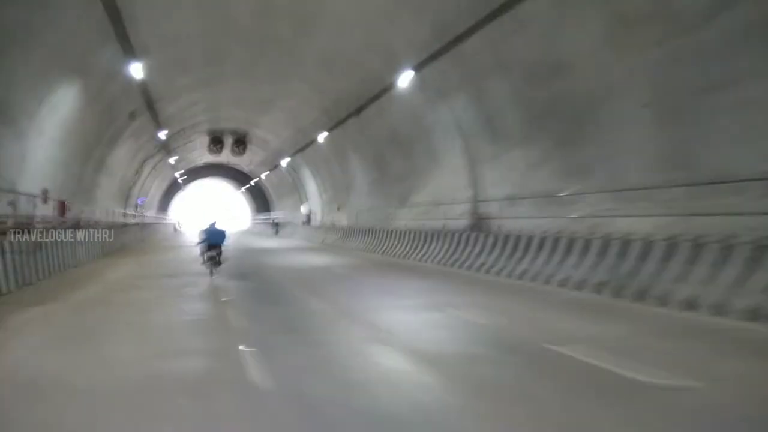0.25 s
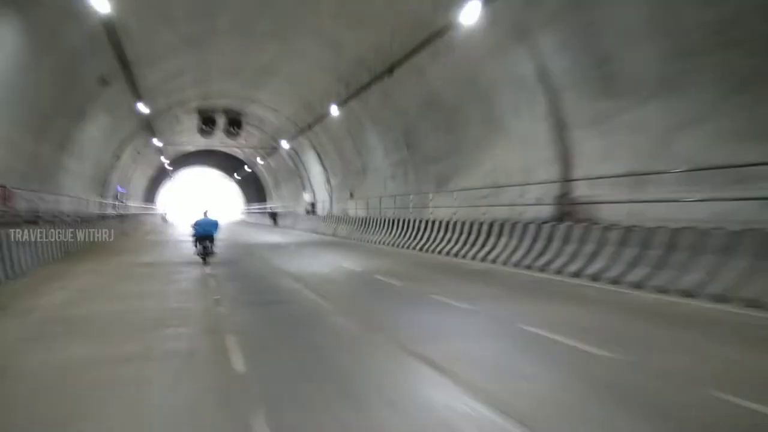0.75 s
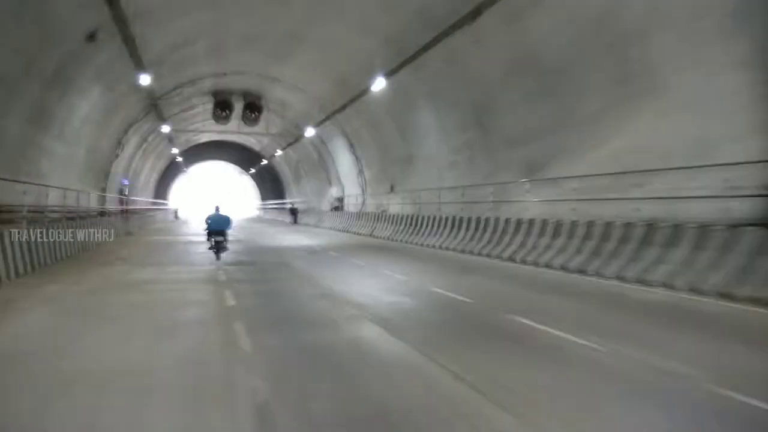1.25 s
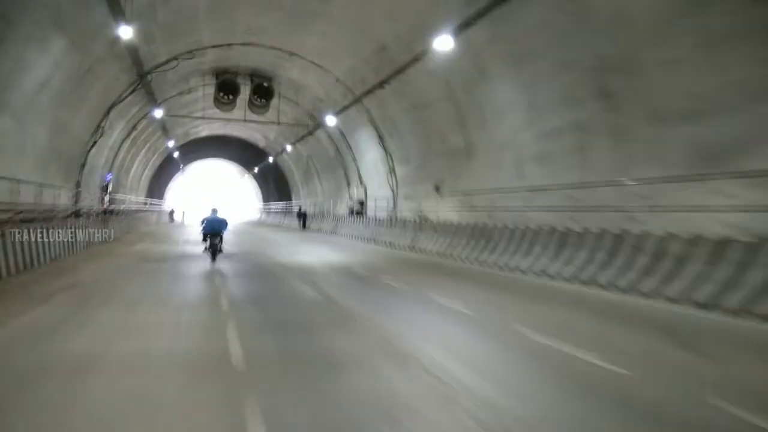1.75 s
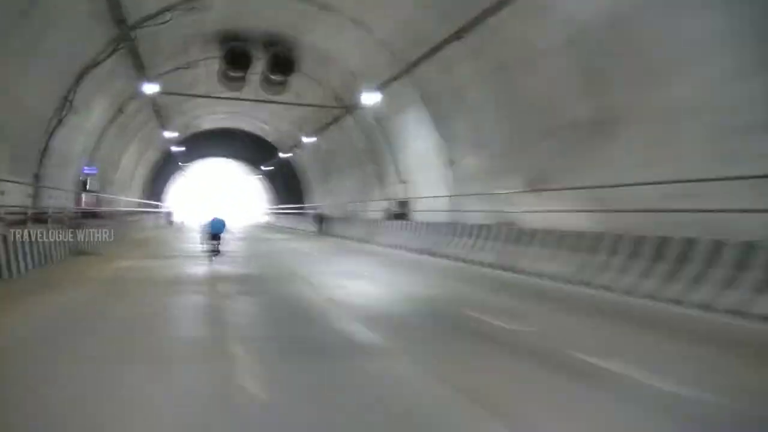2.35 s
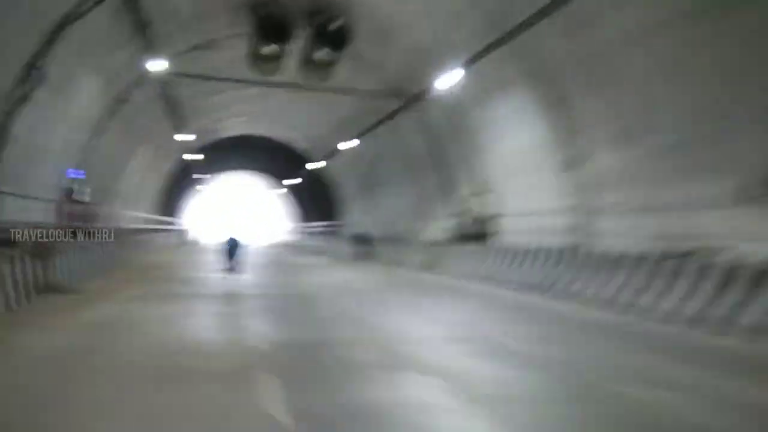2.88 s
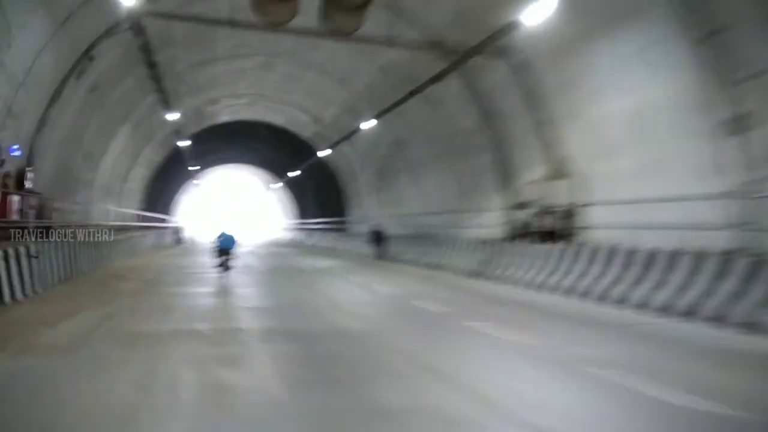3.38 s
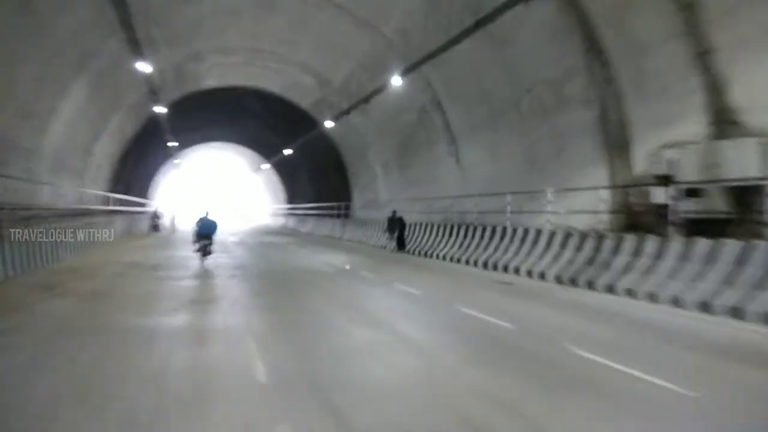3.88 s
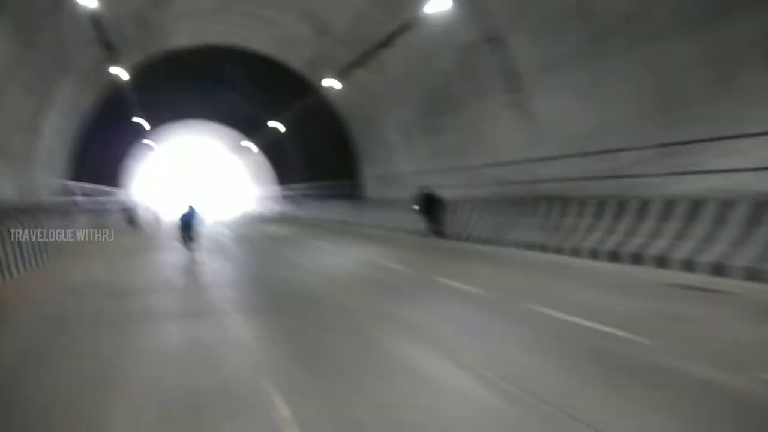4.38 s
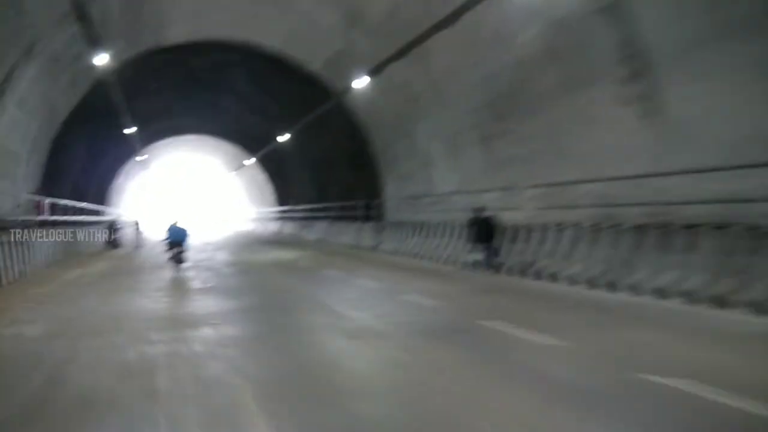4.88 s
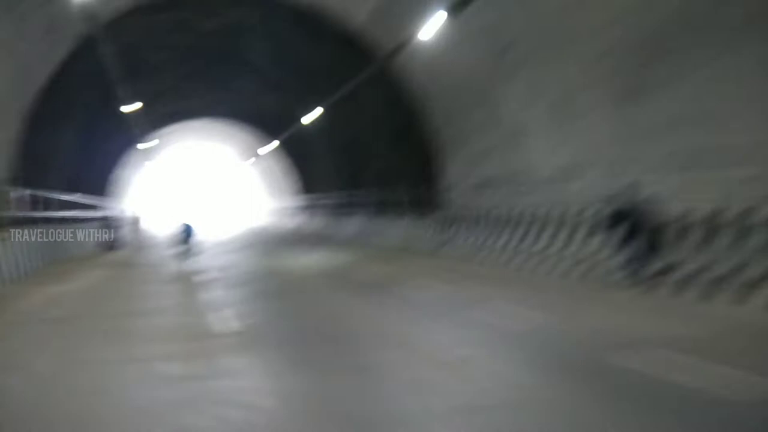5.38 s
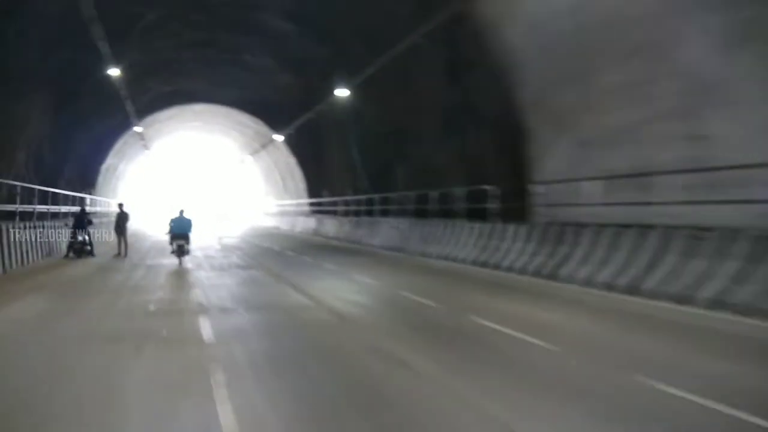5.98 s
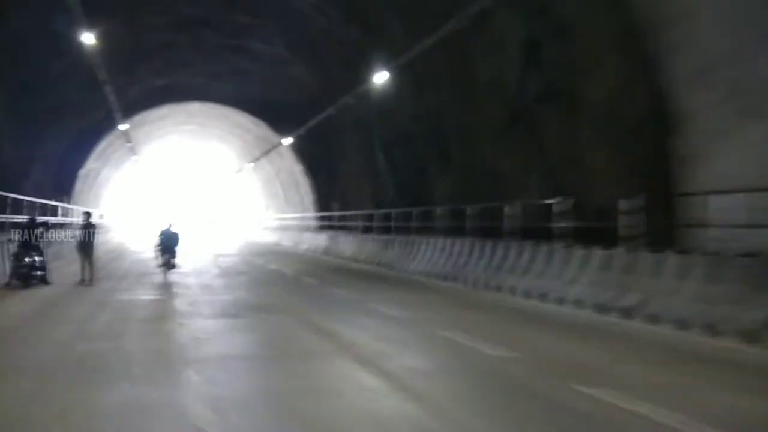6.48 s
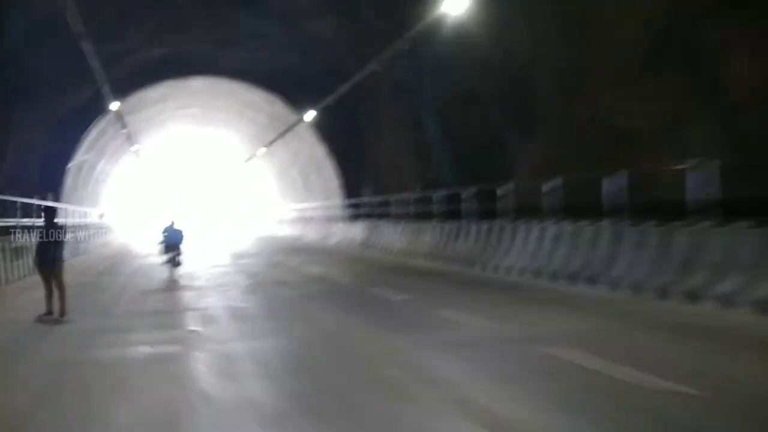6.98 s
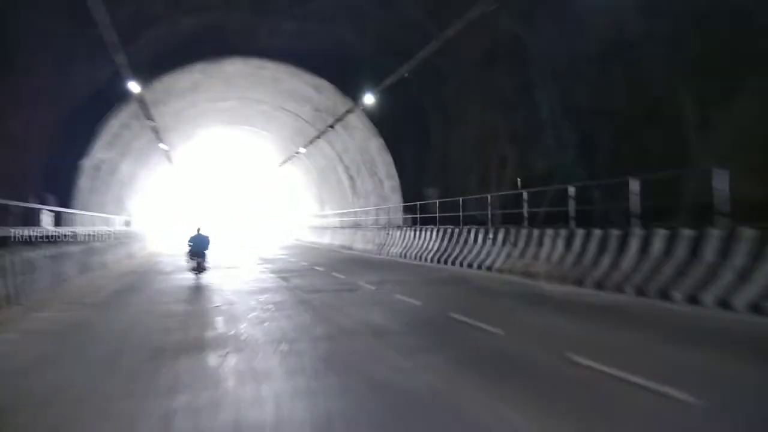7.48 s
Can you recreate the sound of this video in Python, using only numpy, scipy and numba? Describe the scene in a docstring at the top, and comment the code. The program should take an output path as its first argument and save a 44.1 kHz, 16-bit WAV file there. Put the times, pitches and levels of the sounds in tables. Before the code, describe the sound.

Riding a motorcycle steadily through a road tunnel: overloaded wind batters the left microphone, thumps intermittently on the right, covering hiss and low engine drone.

```python
"""Motorcycle in a road tunnel

A two-port camera rides in the airstream of a motorcycle going steadily through a road tunnel.
The left port faces the wind: overdriven turbulence, with crackle, slaps, throbs and knocks as vortex bursts.
The sheltered right port rumbles, thumps and rasps as single gusts reach round to it.
Beneath lie filtered-noise hiss of tyres and air, swishes and tunnel roar, and an engine of uneven
firing pulses that rings the exhaust and returns from the tunnel as a drone."""
import sys
import numpy as np
from scipy import signal
from scipy.fft import rfft, irfft
from scipy.io import wavfile
from scipy.ndimage import uniform_filter1d, minimum_filter1d
from numba import njit

SR = 44100
rng = np.random.default_rng(int(sys.argv[2]) if len(sys.argv) > 2 else 0)


def file_out(sig):
    """Save sig as 16-bit WAV at sys.argv[1]."""
    # one column per channel
    cols = np.atleast_2d(sig).T
    # limit, then scale
    lim = np.clip(cols, -1, 1)
    pcm = np.round(lim * 32767).astype(np.int16)
    wavfile.write(sys.argv[1], SR, pcm)


N = 341334
TIME = np.arange(N) / SR

FIRING_HZ, FLUTTER_HZ = 48.6, 14.15  # mean rates of the exhaust firings and of the hiss's flutter
TOP_HZ = 15600  # upper edge of the recorded band
LEE_RISE_DB_PER_S, LEE_FALL_DB_PER_S, LEE_CALM_DB = 620, 317, -42  # gusts at the sheltered port

# Exhaust as heard from the saddle. Each row: frequency in Hz, relative response in dB.
EXHAUST_COLOUR = [(45, -59), (95, -45), (150, -2), (200, 52), (300, -64), (600, -44), (1500, -8),
                  (5000, -31)]
# Road roar that fills the tunnel. Each row: frequency in Hz, relative response in dB.
ROAR_COLOUR = [(30, -12), (80, 32), (140, 67), (280, -13), (500, 18), (800, -16), (1050, 4), (1500, -25),
               (2000, -12), (4000, -38)]

# Course of the tyre and air hiss. Each row: time in seconds, level in dB above the usual.
HISS_COURSE = [(0.0, -3), (0.47, -10.5), (0.65, 1.5), (0.97, -4), (1.06, 8.5), (1.84, -5.5), (2.21, 2),
               (2.53, -2), (2.94, 5.5), (3.14, -2.5), (3.62, 7), (3.94, 5.5), (4.74, -6.5), (5.55, 3.5),
               (5.64, -2), (6.17, -5), (6.35, 1.5), (7.64, -2.5)]
# Brief changes of that hiss, mostly on the left, before each side takes its share.
# Each row: centre in seconds, rise in dB, half length in seconds.
HISS_SWELLS = [(0.59, 10.5, 0.032), (0.86, 7, 0.06), (1.61, 10, 0.096), (1.89, 15.5, 0.17),
               (2.28, 1, 0.088), (2.44, 6.5, 0.07), (2.78, 5.5, 0.073), (3.07, 8, 0.049), (3.36, 9, 0.029),
               (3.6, -8.5, 0.082), (4.06, 10.5, 0.086), (4.27, 9, 0.034), (4.45, 11, 0.052),
               (4.61, 15.5, 0.082), (4.84, 8, 0.063), (5.0, 4, 0.063), (5.1, 11, 0.031), (5.48, 1.5, 0.082),
               (5.99, 7, 0.068), (6.4, 2, 0.033), (6.57, 8.5, 0.036), (6.75, 15, 0.08), (7.01, 8, 0.093),
               (7.45, 8.5, 0.13)]
# Colour of the hiss at the left port. Each row: frequency in Hz, relative response in dB.
HISS_COLOUR_LEFT = [(1000, 9.5), (3600, 1.5), (4400, -3), (4900, 3.5), (5600, -11), (7600, 8.5), (9100, 1),
                    (10200, 11.5), (11300, 4), (12050, 8.5), (13150, 2.5), (14000, 11), (14900, 5),
                    (15300, -12)]
# Colour of the hiss at the right port. Each row: frequency in Hz, relative response in dB.
HISS_COLOUR_RIGHT = [(1000, -1), (2600, -9), (3800, -18), (5100, 0.5), (6200, -1), (7500, 4.5), (9300, 1),
                     (10200, 4.5), (11200, -3), (14000, -4), (15800, -13)]
# Lower rush of air on the sheltered side. Each row: frequency in Hz, relative response in dB.
RUSH_COLOUR = [(1000, -8), (2100, -9.5), (2600, 8.5), (3150, -17), (3450, 10.5), (3850, -18), (4350, 10.5),
               (4800, 0.5), (5800, -21), (12000, -31)]
# Swishes, stronger on the right. Each row: peak time in seconds, level at the right port in dB,
# rise in seconds, fade in seconds, brightness in dB.
SWISHES = [(.75, -45, 0.97, 1, 7), (1.075, -36, 0.037, 0.27, 18), (1.3, -47.5, 0.1, 0.73, -1),
           (1.85, -33, 0.015, 0.13, 16), (6.73, -46, 0.025, 0.08, 16)]

# Response of the sheltered right port to wind. Each row: frequency in Hz, relative response in dB.
PORT_RIGHT = [(22, -40), (45, -19), (75, -20), (125, 4.5), (200, 8.5), (330, 8.5), (600, 4.5), (950, -11),
              (1500, 5), (2100, -11), (2900, -21), (3800, -31), (12000, -33)]
# Gusts that reach round to the right port. Each row: start of the hold in seconds, hold in seconds,
# relative level in dB.
LEE_GUSTS = [(0.0, 0.033, -21), (0.087, 0.066, -17.5), (0.23, 0.03, -13.5), (0.3, 0.12, -28),
             (0.639, 0.011, -22), (0.728, 0.018, -32), (0.873, 0.026, -16.5), (0.953, 0.041, -30),
             (1.06, 0.01, -27), (1.13, 0.005, -22), (1.205, 0.087, -14.5), (1.346, 0.018, -29),
             (1.447, 0.05, -32), (1.721, 0.18, -16.5), (1.93, 0.02, -22), (2.019, 0.02, -13),
             (2.083, 0.12, -18.5), (2.28, 0.28, -14.5), (2.58, 0.094, -17), (2.718, 0.15, -16),
             (2.877, 0.15, -19), (3.018, 0.082, -14.5), (3.196, 0.097, -28.5), (3.336, 0.03, -27),
             (3.403, 0.084, -29), (3.652, 0.11, -29), (4.006, 0.08, -28), (4.134, 0.01, -29),
             (4.185, 0.06, -17), (4.285, 0.018, -26), (4.431, 0.035, -16.5), (4.5, 0.025, -23),
             (4.572, 0.01, -31), (4.667, 0.032, -20), (4.749, 0.064, -18.5), (4.904, 0.054, -25),
             (4.99, 0.026, -14.5), (5.055, 0.053, -24), (5.168, 0.05, -42), (5.583, 0.086, -29),
             (5.736, 0.01, -46), (5.98, 0.048, -29), (6.11, 0.01, -30), (6.276, 0.018, -19.5),
             (6.343, 0.033, -30), (6.483, 0.005, -25), (6.529, 0.015, -15.5), (6.623, 0.14, -35),
             (6.772, 0.11, -17), (6.9, 0.11, -22), (7.06, 0.088, -27), (7.355, 0.039, -23),
             (7.408, 0.056, -14.5), (7.49, 0.05, -25), (7.657, 0.09, -36)]
# Single large eddies at the right port. Each row: centre in seconds, relative level in dB, pitch in Hz.
THUMPS = [(0.255, -5, 197), (0.878, -14, 238), (1.793, -2, 240), (1.876, -4, 204), (2.017, -4, 220),
          (2.325, -6, 203), (2.428, -11, 217), (2.497, -2, 234), (2.583, -12, 227), (2.728, -5, 206),
          (2.78, -2, 272), (2.817, -5, 257), (2.972, -11, 204), (3.039, -15, 297), (3.097, 0, 239),
          (4.451, -3, 236), (5.0, -6, 325), (6.537, -6.5, 190), (6.809, -11, 226), (6.843, -8, 235),
          (7.443, -11, 234)]
# Gusts that tear across the right port. Each row: centre in seconds, half length in seconds,
# bark level in dB, rasp level in dB.
RASPS = [(0.115, 0.0083, -38, -48), (0.251, 0.011, -32, -25.5), (1.056, 0.01, -32, -53),
         (1.218, 0.014, -35, -35), (1.603, 0.009, -40, -40), (1.744, 0.009, -30, -52),
         (1.793, 0.0081, -44, -36), (1.962, 0.007, -46, -37), (2.023, 0.012, -31, -44),
         (2.102, 0.014, -50, -31), (2.198, 0.012, -29, -52), (2.28, 0.008, -19, -45),
         (2.323, 0.0074, -22, -25), (2.39, 0.0052, -36, -30), (2.429, 0.008, -30, -23.5),
         (2.468, 0.0076, -31, -31), (2.499, 0.014, -24, -27), (2.525, 0.0055, -31, -30),
         (2.62, 0.012, -34, -38), (2.775, 0.019, -21.5, -26), (2.9, 0.016, -30, -30.5),
         (3.093, 0.01, -26, -27), (3.206, 0.0098, -49, -35), (3.36, 0.01, -34, -52), (3.88, 0.01, -34, -32),
         (4.138, 0.011, -31, -34), (4.217, 0.035, -28, -39), (4.443, 0.016, -25.5, -40),
         (5.001, 0.01, -39, -52), (5.054, 0.0069, -28, -29), (5.202, 0.0078, -29, -28),
         (6.48, 0.009, -37, -54), (6.818, 0.01, -25, -40), (7.427, 0.0089, -23, -26),
         (7.458, 0.016, -29, -25.5), (7.703, 0.008, -30, -54)]
# Lower resonance that such a gust excites. Each row: frequency in Hz, relative response in dB.
BARK_COLOUR = [(350, -37), (600, 5), (790, 1), (1000, -9), (1250, -17), (1600, -35)]
# Upper resonance that such a gust excites. Each row: frequency in Hz, relative response in dB.
RASP_COLOUR = [(950, -34), (1350, 4.5), (1600, 4.5), (1900, -6), (2200, -12), (2800, -23.5), (3300, -23),
               (6000, -61)]

# Response of the windward left port to wind. Each row: frequency in Hz, relative response in dB.
PORT_LEFT = [(22, -43), (45, -28), (75, -29), (125, -5), (180, -0.5), (300, 3), (550, 4.5), (675, -16),
             (780, -15), (930, 4.5), (1200, -1), (1950, -46), (2850, 0), (3300, -26), (4500, 2.5),
             (5600, -53), (12000, -31)]
# Slow course of the wind at the left port. Each row: time in seconds, strength in dB above the usual.
WIND_COURSE = [(0.0, 18.5), (0.22, -6.5), (0.59, 8), (1.0, 6), (1.76, 0.2), (2.2, -4.5), (2.66, -14.5),
               (2.91, -10.5), (3.19, 6), (3.78, -2), (4.1, -3), (4.51, -17), (4.79, 2), (5.36, -6),
               (6.03, 6.5), (6.39, -5), (6.95, 2.5), (7.54, -5)]
# Gusts on top of that wind. Each row: peak time in seconds, rise in dB, half length in seconds.
WIND_GUSTS = [(0.15, 5, 0.043), (0.35, 15, 0.12), (0.54, 17, 0.021), (1.14, 6, 0.073), (1.43, 11.5, 0.081),
              (1.99, 6, 0.2), (2.44, 12.5, 0.2), (2.81, 15, 0.083), (2.98, 6.5, 0.034), (3.51, 4.5, 0.063),
              (3.86, 10, 0.058), (4.31, 17, 0.14), (4.66, 14.5, 0.12), (5.02, 5.5, 0.086), (5.13, 7, 0.035),
              (5.42, 11.5, 0.059), (5.64, 8, 0.13), (5.85, 16, 0.017), (6.19, 8, 0.072),
              (6.68, 13.5, 0.023), (7.14, 9.5, 0.13), (7.37, 8, 0.01), (7.61, 15.5, 0.056)]
# Brief drops of the buffeting. Each row: centre in seconds, change in dB, half length in seconds.
DIPS = [(0.577, -3, 0.03), (1.206, -10, 0.013), (1.974, -3, 0.015), (2.072, -7.5, 0.0069),
        (2.271, -9.5, 0.018), (2.413, -6, 0.013), (2.885, -5, 0.012), (4.392, -4, 0.0066),
        (4.921, -11, 0.0073), (6.338, -1.5, 0.016), (6.53, -7, 0.013), (6.634, -7, 0.012),
        (6.707, -7, 0.0071), (7.279, -2, 0.046)]
# Large eddies throbbing at the left port. Each row: centre in seconds, level in dB, pitch in Hz.
THROBS = [(0.289, -4.5, 177), (0.668, -4, 195), (1.231, -4.5, 182), (1.295, -8, 193), (1.578, -8, 250),
          (1.634, -10, 188), (1.747, -10, 185), (2.354, -10, 205), (3.429, -6.5, 172), (3.778, -7.5, 179),
          (3.82, -9.5, 178), (4.321, -3, 215), (4.441, -6, 200), (4.697, -5, 176), (4.854, -5, 204),
          (5.063, -4.5, 179), (5.411, -5.5, 206), (5.565, -5, 222), (6.013, -7, 220), (6.291, -6, 233),
          (6.397, -6, 189), (6.556, -7.5, 227), (6.886, -7, 176), (6.951, -2.5, 253), (7.624, -2.5, 181),
          (7.693, -6, 190)]
# Dull, hollow knocks of air at the left port. Each row: centre in seconds, level in dB, pitch in Hz.
KNOCKS = [(0.098, -26, 826), (0.368, -18, 694), (0.415, -19, 737), (0.528, -13, 820), (0.543, -15, 815),
          (0.927, -16, 830), (1.356, -18, 784), (1.473, -19, 814), (3.368, -18, 833), (3.397, -17, 820),
          (4.287, -16, 700), (4.647, -19, 803), (4.678, -15.5, 790), (5.628, -14, 820), (6.216, -19.5, 780),
          (6.824, -19, 805)]
# The hardest gusts tear at the left port. Each row: centre in seconds, level in dB,
# half length in seconds.
TEARS = [(0.35, -27, 0.033), (0.54, -34, 0.022), (4.31, -33, 0.018), (5.12, -32, 0.028),
         (5.62, -33.5, 0.025), (5.86, -35, 0.018), (6.19, -33, 0.035), (7.125, -37, 0.025)]
# Colour of that tearing. Each row: frequency in Hz, relative response in dB.
TEAR_COLOUR = [(700, -34), (1100, 7), (2000, 7), (2800, -5), (3500, -5), (4500, -12), (5600, -22),
               (9000, -45)]
# Hard slaps of air on the left port. Each row: centre in seconds, relative body level in dB,
# pitch in Hz, relative crack level in dB.
SLAPS = [(0.073, -13, 1150, -39), (0.086, -14, 1030, -18.5), (0.098, -8.5, 955, -28),
         (0.127, -13, 1160, -32), (0.141, -15, 1190, -22), (0.16, -8.5, 1140, -28),
         (0.283, -8, 1070, -57.5), (0.304, -19, 1010, -11.5), (0.318, -16, 1430, -17),
         (0.349, -11, 1540, -18), (0.359, -8, 1160, -27), (0.367, -7, 1350, -29), (0.416, -15, 1200, -25),
         (0.435, -16, 1110, -39), (0.441, -14, 1250, -20), (0.464, -15, 1230, -26), (0.527, -10, 1160, -18),
         (0.536, -14, 1220, -25.5), (0.543, -27, 1120, -31), (0.553, -13, 1340, -29),
         (0.571, -9, 1030, -27), (0.623, -13, 1020, -26), (0.635, -9.5, 1170, -33),
         (0.683, -14.5, 1120, -26), (0.713, -16, 1350, -23), (0.743, -13.5, 1170, -21.5),
         (0.765, -14, 1080, -24.0), (0.976, -23, 1020, -25), (1.041, -14, 1190, -32),
         (1.089, -13, 1130, -27), (1.1, -12, 1120, -32), (1.318, -9.5, 980, -50), (1.359, -12, 980, -25),
         (1.393, -2, 910, -20), (1.433, -7.5, 1330, -33), (1.466, -12, 1130, -33), (1.472, -16, 1125, -29),
         (1.58, -11.5, 1100, -16.5), (1.588, -13, 1140, -23), (1.664, -10.5, 1000, -41),
         (1.91, -13, 1190, -22), (1.927, -17, 1300, -32), (1.943, -21, 1350, -32), (1.985, -21, 1400, -31),
         (2.026, -12, 1370, -31), (2.131, -11.5, 1240, -48), (2.212, -12, 1200, -33),
         (2.394, -10, 1080, -38), (2.506, -8.5, 980, -48), (2.812, -8, 1140, -33), (3.146, -18, 1290, -21),
         (3.173, -14, 1100, -16), (3.193, -30, 1100, -22), (3.205, -15, 1060, -31.5), (3.23, -6, 1110, -20),
         (3.26, -9, 1060, -32), (3.281, -9.5, 1110, -22), (3.341, -13, 1060, -41), (3.369, -9.5, 1130, -22),
         (3.396, -14, 1060, -37), (3.456, -11, 1160, -37), (3.472, -6.5, 1190, -45),
         (3.51, -8.5, 1090, -46), (3.573, -6.5, 1110, -43), (3.585, -11, 1030, -51),
         (3.814, -7.5, 900, -56), (3.925, -9.5, 930, -56), (4.129, -8.5, 960, -43),
         (4.211, -11.5, 1040, -43), (4.226, -9, 1020, -35), (4.311, -14, 970, -21), (4.345, -18, 1050, -30),
         (4.58, -20, 1320, -22), (4.678, -10, 990, -23), (4.693, -12, 1280, -21.5), (4.742, -24, 1200, -20),
         (4.782, -15, 1140, -26), (4.794, -12, 1060, -36), (4.945, -11, 1180, -21),
         (5.009, -11.5, 1290, -25), (5.017, -11.5, 1300, -23), (5.066, -11, 1080, -36),
         (5.1, -29, 1200, -15.5), (5.133, -13, 960, -12), (5.399, -10.5, 1180, -29),
         (5.411, -15, 1250, -19), (5.422, -8.5, 1140, -20), (5.607, -8, 1290, -24), (5.613, -9, 1220, -25),
         (5.63, -7, 1000, -20), (5.643, -14, 1090, -33), (5.714, -15, 1240, -21), (5.739, -14, 1180, -18.5),
         (5.846, -12, 1130, -41), (5.859, -21, 1090, -26), (5.936, -8, 1330, -28),
         (5.992, -10.5, 1200, -27), (6.019, -9, 1190, -21.0), (6.172, -13, 1320, -18),
         (6.187, -19, 1190, -21), (6.206, -10, 1010, -23), (6.301, -10, 1020, -42), (6.31, -11, 1090, -36),
         (6.611, -9.5, 1030, -47.5), (6.655, -9.5, 1100, -33), (6.696, -11, 1080, -40.0),
         (6.823, -9, 1070, -27), (7.017, -14, 1140, -26), (7.063, -13, 1140, -29.0),
         (7.108, -10, 1310, -17), (7.123, -9.5, 1200, -32), (7.135, -9, 1320, -17), (7.2, -11, 1250, -25),
         (7.212, -15, 1080, -17), (7.293, -18, 1010, -20), (7.363, -17, 1370, -20)]
# Thin, bright ticks at the left port. Each row: centre in seconds, level in dB.
TICKS = [(0.358, -21), (0.369, -23), (0.977, -20.5), (1.911, -21), (5.101, -34), (5.133, -33)]


def undb(db):
    """Decibels to gain."""
    return 10 ** (np.asarray(db) / 20)


def curve(rows):
    """Rows (s, value) joined by straight lines."""
    return np.interp(TIME, *np.transpose(rows))


def unit(x):
    """Scale to rms 1."""
    return x / np.sqrt(np.mean(x ** 2))


def smooth(x, seconds):
    """Triangular running mean."""
    size = max(int(seconds * SR), 1)
    return uniform_filter1d(uniform_filter1d(x, size), size)


def flicker(seconds):
    """Random drift of rms 1 that changes within the given time."""
    return unit(smooth(rng.standard_normal(N), seconds))


def colour(x, points):
    """Causal minimum-phase filter with the given (Hz, dB) response, made by folding its cepstrum."""
    size = 4096
    hz, db = np.transpose(points)
    bins = np.maximum(np.arange(size // 2 + 1) * SR / size, 1)
    response_db = np.interp(np.log(bins), np.log(hz), db)
    cepstrum = irfft(np.log(undb(response_db)))
    cepstrum[1:size // 2] *= 2
    cepstrum[size // 2 + 1:] = 0
    impulse = irfft(np.exp(rfft(cepstrum)))
    return signal.oaconvolve(x, impulse)[:len(x)]


def hold_level(x, seconds):
    """Fast gain control that keeps the running rms near 1."""
    return x / np.sqrt(np.abs(smooth(x ** 2, seconds)) + 1e-12)


@njit
def lowpass(x, hz):
    """Two-pole low-pass with a moving corner."""
    y, band, low = np.empty(len(x)), 0., 0.
    for i in range(len(x)):
        g = np.tan(np.pi * hz[i] / SR)
        v = (band + g * (x[i] - low)) / (1 + g * (g + np.sqrt(2.)))
        y[i] = low + g * v
        band, low = 2 * v - band, 2 * y[i] - low
    return y


def eddies(hz, slowest_hz=35):
    """Turbulent pressure of rms 1; faster air carries quicker eddies."""
    hz = np.clip(hz, 20, 2000)
    highpass = signal.butter(2, slowest_hz, "high", fs=SR, output="sos")
    stirring = signal.sosfilt(highpass, rng.standard_normal(N))
    return unit(lowpass(stirring, hz) / np.sqrt(hz))


def bell_span(s, half_s):
    """The samples within three half lengths of the time s."""
    return slice(max(int((s - 3 * half_s) * SR), 0), max(int((s + 3 * half_s) * SR), 0))


def pip(s, db, hz, half_s, phase):
    """A few cycles under a bell centred on s: (its samples, its sound)."""
    span = bell_span(s, half_s)
    t = TIME[span] - s
    return span, undb(db) * np.exp(-(t / half_s) ** 2) * np.cos(2 * np.pi * (hz * t + phase))


def bells(rows):
    """A bell-shaped change in dB for each (s, change dB, half length s)."""
    out = np.zeros(N)
    for s, db, half_s in rows:
        span, bell = pip(s, 0, 0, half_s, 0)
        out[span] += db * bell
    return out


def packets(rows, cycles, glide):
    """Vortices brushing a port: for each (s, dB, Hz) a few gliding cycles under a bell."""
    out = np.zeros(N)
    for (s, db, hz), (phase, bend, length) in zip(rows, rng.standard_normal((len(rows), 3))):
        half_s = cycles / hz / 2 * undb(2 * length)
        span = bell_span(s, half_s)
        u = (TIME[span] - s) / half_s
        turns = hz * half_s * (u + glide * bend * u ** 2) + phase
        out[span] += undb(db) * np.exp(-u ** 2) * np.cos(2 * np.pi * turns)
    return out


def vortices(per_second, centre_hz, octaves, cycles, size_db, glide):
    """A random stream of small vortices, rms 1."""
    when, pitch, size = rng.random((int(per_second * N / SR), 3)).T
    level_db = -size_db * np.log(1 - size)  # many small, few large
    hz = centre_hz * 2 ** (octaves * (pitch - .5))
    return unit(packets(np.array([when * N / SR, level_db, hz]).T, cycles, glide))


def bursts(rows, points):
    """Bursts of turbulence of one colour, one for each (s, level dB, half length s)."""
    noise = hold_level(colour(rng.standard_normal(N), points), .008)
    out = np.zeros(N)
    for s, db, half_s in rows:
        span, bell = pip(s, db, 0, half_s, 0)
        out[span] += noise[span] * bell
    return out


def roar(level_db=-50):
    """Diffuse road noise from the tunnel walls: noise drawn apart for each side, swelling together."""
    sides = np.array([unit(colour(rng.standard_normal(N), ROAR_COLOUR)) for _ in range(2)])
    return sides * undb(level_db + 1.5 * flicker(.3))


def engine(level_db=-51, tunnel_db=-1, t60_s=1.5):
    """Uneven firings ring the exhaust; the tunnel returns them as a long drone."""
    cycles = np.floor(np.cumsum(FIRING_HZ * (1 + 0.0047 * flicker(1.0))) / SR)
    firings = np.diff(cycles, prepend=0) * undb(9.9 * flicker(0.0061))
    direct = unit(colour(firings, EXHAUST_COLOUR))
    decay = np.exp(-np.log(1000) * TIME[:2 * SR] / t60_s)
    tails = rng.standard_normal((2, 2 * SR)) * decay
    echo = np.array([unit(signal.fftconvolve(direct, tail)[:N]) for tail in tails])
    return undb(level_db) * (direct + undb(tunnel_db) * echo)


def shimmer(x, depth_db, size=1024):
    """Narrow bands of the sound swell and sink on their own."""
    spectra = signal.stft(x, nperseg=size)[2]
    drift = uniform_filter1d(rng.standard_normal(spectra.shape), size=4, axis=0)  # across frequency
    drift = uniform_filter1d(drift, size=10, axis=1)  # across time
    return signal.istft(spectra * undb(depth_db * unit(drift)), nperseg=size)[1][:N]


def wander(x, split_hz=9000, depth_db=1.7):
    """The top of a hiss swells and sinks against its lower part."""
    low = signal.sosfiltfilt(signal.butter(3, split_hz, fs=SR, output="sos"), x)
    return low * undb(depth_db * flicker(0.042)) + (x - low) * undb(depth_db * flicker(0.027))


def hiss(pinned, choke=0.12, pulse_db=3, left_db=-46.5, right_db=-47.0, left_share=0.99,
         right_share=0.78, lee_swell_share=0.81, waver_db=0.5, rush_db=-52, rush_share=0.7):
    """Tyre and air hiss, fluttering in quick, even pulses and choked on the left as that microphone
    is pinned; a steadier, lower rush on the sheltered side."""
    course_db = curve(HISS_COURSE) + waver_db * flicker(0.034)
    swell_db = bells(HISS_SWELLS)
    lee_db = course_db + lee_swell_share * swell_db

    flutter_cycles = np.cumsum(FLUTTER_HZ * (1 + 0.006 * flicker(0.16))) / SR
    pulse = np.cos(np.pi * flutter_cycles) ** 12  # the even power gives one pulse a cycle
    flutter_db = pulse_db * (pulse - pulse.mean()) + 1.3 * flicker(0.02)

    left, right, rush = (shimmer(rng.standard_normal(N), 3.5) for _ in range(3))
    left = wander(colour(left, HISS_COLOUR_LEFT)) * (1 - choke * pinned)
    left = unit(left * undb(flutter_db)) * undb(left_db + left_share * (course_db + swell_db))
    right = unit(colour(right, HISS_COLOUR_RIGHT) * undb(flutter_db))
    right = right * undb(right_db + right_share * lee_db)
    rush = unit(colour(rush, RUSH_COLOUR)) * undb(rush_db + rush_share * lee_db)
    return np.array([left, right + rush])


def swishes(left_db=-6):
    """Swells of lower hiss that rise and fade away; the sudden ones reach higher."""
    out = np.zeros((2, N))
    for s, db, rise_s, fade_s, bright_db in SWISHES:
        swell = undb(db) * np.exp(-np.maximum((s - TIME) / rise_s, (TIME - s) / fade_s))
        shape = [(3400, -17), (4200, 16.0), (4850, 13.0),
                 (6000, bright_db - 6.5), (8000, bright_db - 9.5), (11000, bright_db - 24)]
        for side, side_db in enumerate((left_db, 0)):
            out[side] += unit(colour(rng.standard_normal(N), shape)) * swell * undb(side_db)
    return out


def lee_strength(waver_db=1.5, waver_s=0.018):
    """Wind on the sheltered port (dB): out of near calm each gust rises, holds unsteadily and falls."""
    power = undb(LEE_CALM_DB) ** 2
    for s, hold_s, db in LEE_GUSTS:
        before_db = LEE_RISE_DB_PER_S * np.maximum(s - TIME, 0)
        after_db = LEE_FALL_DB_PER_S * np.maximum(TIME - s - hold_s, 0)
        power = power + undb(db - before_db - after_db) ** 2
    return 10 * np.log10(power) + waver_db * flicker(waver_s)


def sheltered(gust_db, eddy_hz=175, overload_db=-13, level_db=-2.0, speed_share=.75, flicker_db=2.2):
    """Weak gusts only rumble; strong ones quicken, overload the microphone and rasp."""
    excess_db = gust_db - overload_db
    pressure = eddies(eddy_hz * undb(speed_share * excess_db))
    pressure = pressure * undb(excess_db + flicker_db * flicker(0.011))
    return hold_level(colour(np.tanh(pressure), PORT_RIGHT), .025) * undb(gust_db + level_db)


def thumps(level_db=-2):
    """Single large eddies thump the sheltered port."""
    return packets(THUMPS, cycles=1.9, glide=0.078) * undb(level_db)


def rasps(gust_db, burble_db=-10, fizz_db=-28, fizz_share=0.54, usual_db=-17):
    """Gusts on the sheltered port burble low and fizz faintly; the sharpest bark and rasp."""
    bark = bursts([(s, db, half_s) for s, half_s, db, _ in RASPS], BARK_COLOUR)
    rasp = bursts([(s, db, half_s) for s, half_s, _, db in RASPS], RASP_COLOUR)
    burble = vortices(per_second=130, centre_hz=293, octaves=1.86, cycles=3.2, size_db=2.5, glide=0.019)
    fizz = vortices(per_second=260, centre_hz=1400, octaves=1.9, cycles=4, size_db=3.0, glide=0.02)
    fizz_level_db = usual_db + fizz_share * (gust_db - usual_db) + fizz_db
    return bark + rasp + burble * undb(gust_db + burble_db) + fizz * undb(fizz_level_db)


def wind_strength(waver_db=2.5, waver_s=0.035):
    """Wind on the windward port (dB): a slow course, gusts on top, and a random waver."""
    return curve(WIND_COURSE) + bells(WIND_GUSTS) + waver_db * flicker(waver_s)


def surges():
    """Eddies roll off the bodywork some tens of times a second, so the wind comes in quick pushes (dB)."""
    rates = [(5, -8), (14, -2), (28, 0), (48, -2), (80, -20), (300, -60)]
    return 3.2 * unit(colour(rng.standard_normal(N), rates))


def lulls(depth_db=6, lead_s=.005, length_s=.007):
    """The buffeting and small crackle give way just before and during each hard slap (dB)."""
    return -depth_db * np.minimum(1, bells([(row[0] - lead_s, 1, length_s) for row in SLAPS]))


def windward(gust_db, lull_db, eddy_hz=140, drive_db=4, gust_share=0.9, speed_share=0.19,
             level_db=-11.5, waver_db=1.5, split_hz=700, rumble_lull_share=0.034):
    """Eddies throw the microphone from stop to stop, more sharply in harder gusts.
    Also returns how pinned it is (0 to 1)."""
    pressure = eddies(eddy_hz * undb(speed_share * gust_db))
    swing = np.tanh(pressure * undb(drive_db + gust_share * gust_db))
    buffet = hold_level(colour(swing, PORT_LEFT), .03)
    rumble = signal.sosfiltfilt(signal.butter(6, split_hz, fs=SR, output="sos"), buffet)
    upper = buffet - rumble
    buffet = rumble * undb(rumble_lull_share * lull_db) + upper * undb(lull_db)
    return buffet * undb(level_db + waver_db * flicker(0.013)), swing ** 2


def throbbing(buffet, yield_db=-6, half_s=0.0046):
    """Each large eddy pushes the buffeting aside and throbs; now and then the buffeting drops away."""
    change_db = bells(DIPS) + bells([(s, yield_db, half_s) for s, _, _ in THROBS])
    return buffet * undb(change_db) + packets(THROBS, cycles=3.75, glide=0.055)


def crackle(gust_db, surge_db, rattle_db=-35.0, rattle_share=0.71, snap_db=-46.0, snap_share=1.0,
            surge_share=0.21, sizzle_db=-46.0, sizzle_share=0.74):
    """Small vortices grow louder with the gust: they rattle near the port's resonance, snap higher up,
    and the finest merge into a sizzle."""
    rattle = vortices(per_second=300, centre_hz=1080, octaves=.45, cycles=4.5, size_db=1.5, glide=.04)
    snap = vortices(per_second=450, centre_hz=1650, octaves=.7, cycles=4, size_db=1.8, glide=.05)
    sizzle = vortices(per_second=450, centre_hz=2600, octaves=.3, cycles=6, size_db=1.5, glide=.03)
    return (rattle * undb(rattle_db + rattle_share * gust_db + surge_db)
            + snap * undb(snap_db + snap_share * gust_db + surge_share * surge_db)
            + sizzle * undb(sizzle_db + sizzle_share * gust_db + surge_share * surge_db))


def knocks():
    """Short, hollow knocks just under the port's resonance."""
    return packets(KNOCKS, cycles=7.0, glide=0.027)


def tears():
    """The hardest gusts tear roughly at the windward port as bursts of coloured turbulence."""
    return bursts(TEARS, TEAR_COLOUR)


def strays(wind_db, count, level_db, share, centre_hz, octaves, spread_db):
    """Rows (s, dB, pitch Hz) at random moments, louder where the wind is stronger."""
    when, size, pitch = rng.random((count, 3)).T
    seconds = (np.arange(count) + when) / count * TIME[-1]
    peak_db = level_db + share * np.interp(seconds, TIME, wind_db) + spread_db * (size - .5)
    return list(zip(seconds, peak_db, centre_hz * 2 ** (octaves * (pitch - .5))))


def slaps(hits, body_db=-3.0, ring_db=-11, ring_hz=1000, ring_s=0.0016, crack_gain_db=-1.5,
          crack_hz=2480, edge_db=-19, edge_hz=4350):
    """Slaps on the windward port, each of its own colour: body, port resonance, snap, crack and
    thin edge peak together and a small eddy follows."""
    body_cycles, crack_s, edge_s = 3, .00095, .0009
    snap_db, snap_hz, snap_s, wake_db, wake_s = -3, 1680, .0013, -5, .004
    colour_spread, edge_spread_db = .14, 6
    out = np.zeros(N)
    for (s, db, hz, crack_db), (phase, lag, *own) in zip(hits, rng.random((len(hits), 5))):
        snap_shift, crack_shift, edge_shift = 2 * np.array(own) - 1
        middle_db = (db + crack_db) / 2
        own_snap_hz = snap_hz * (1 + colour_spread * snap_shift)
        own_crack_hz = crack_hz * (1 + colour_spread * crack_shift)
        own_edge_db = crack_db + edge_db + edge_spread_db * edge_shift
        parts = [(s, db + body_db, hz, body_cycles / hz / 2),
                 (s, db + ring_db, ring_hz, ring_s),
                 (s, middle_db + snap_db, own_snap_hz, snap_s),
                 (s, crack_db + crack_gain_db, own_crack_hz, crack_s),
                 (s, own_edge_db, edge_hz, edge_s),
                 (s + wake_s * (.5 + lag), middle_db + wake_db, (hz + snap_hz) / 2, crack_s)]
        for part in parts:
            span, sound = pip(*part, phase)
            out[span] += sound
    return out


def ticks(hz=4200, half_s=.0004):
    """Bright ticks on the windward port, each a very short ring under a bell."""
    out = np.zeros(N)
    for (s, db), phase in zip(TICKS, rng.random(len(TICKS))):
        span, sound = pip(s, db, hz, half_s, phase)
        out[span] += sound
    return out


def scene(stray_crack_db=-15):
    """Wind on both ports over the sounds of the ride."""
    gust_db, lee_db, surge_db, lull_db = wind_strength(), lee_strength(), surges(), lulls()
    faint = strays(gust_db, count=70, level_db=-25, share=.5, centre_hz=1250, octaves=0.7, spread_db=4)
    hits = SLAPS + [(s, db, hz, db + stray_crack_db) for s, db, hz in faint]
    buffet, pinned = windward(gust_db + surge_db, lull_db)
    ride = roar() + engine() + hiss(pinned) + swishes()
    right = sheltered(lee_db) + thumps() + rasps(lee_db)
    left = throbbing(buffet) + crackle(gust_db, surge_db) * undb(lull_db)
    left = left + knocks() + tears() + slaps(hits) + ticks()
    return ride + np.array([left, right])


def record(dry, ceiling=0.79, hold_s=0.0012):
    """A limiter holds down the peaks; a steep low-pass cuts the top."""
    room = np.minimum(1, ceiling / (np.abs(dry) + 1e-9))
    gain = smooth(minimum_filter1d(room, 2 * int(hold_s * SR) + 1), hold_s)
    return signal.sosfilt(signal.ellip(8, .2, 80, TOP_HZ, fs=SR, output="sos"), dry * gain)


dry = scene()
out = record(dry)
file_out(out)
```